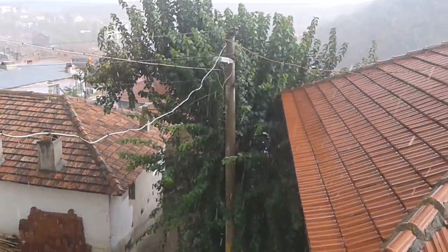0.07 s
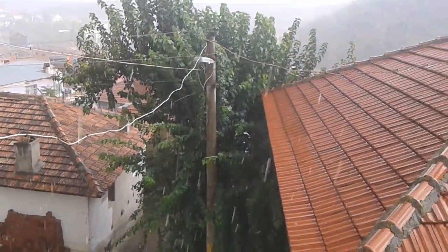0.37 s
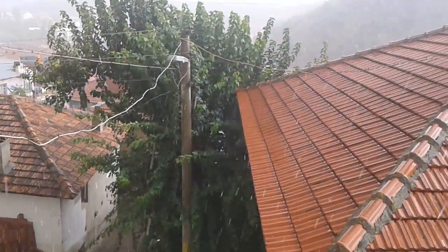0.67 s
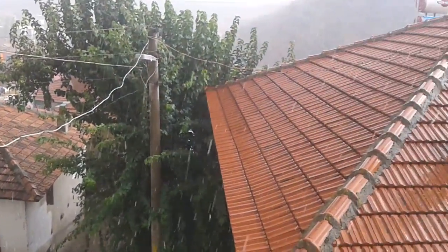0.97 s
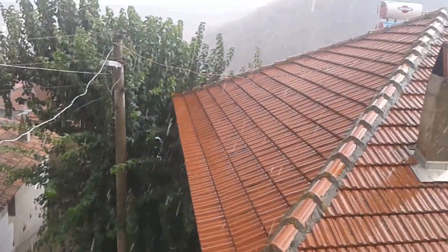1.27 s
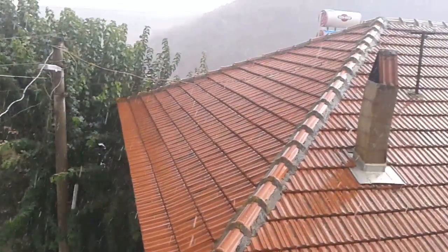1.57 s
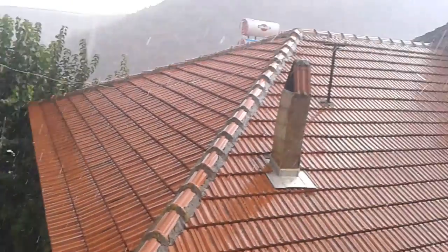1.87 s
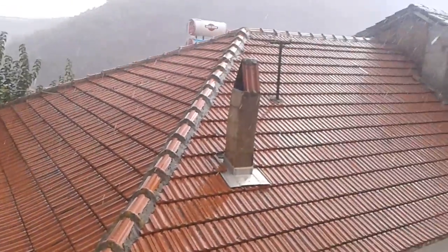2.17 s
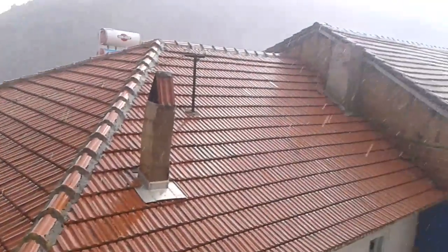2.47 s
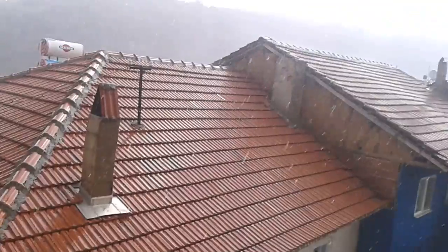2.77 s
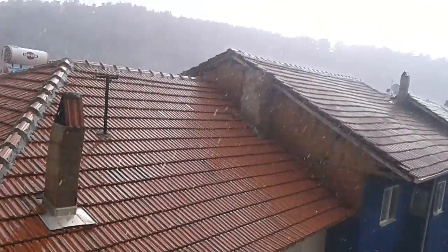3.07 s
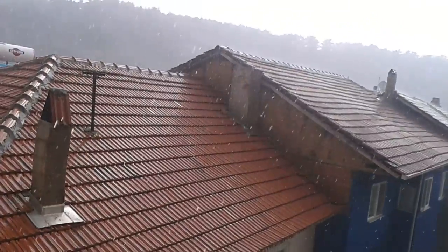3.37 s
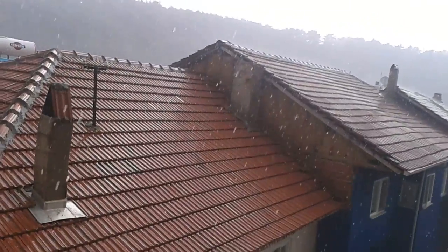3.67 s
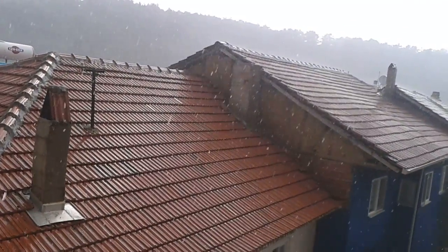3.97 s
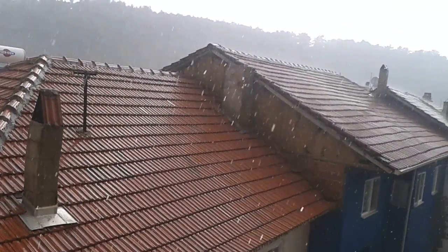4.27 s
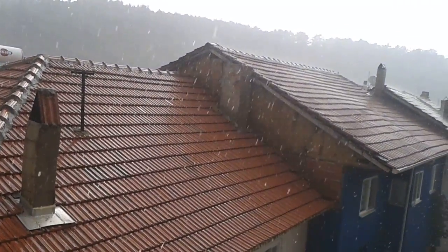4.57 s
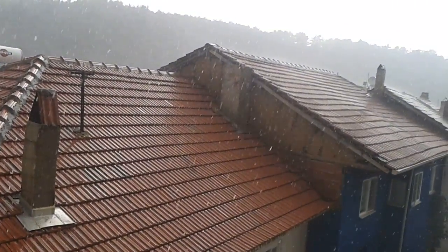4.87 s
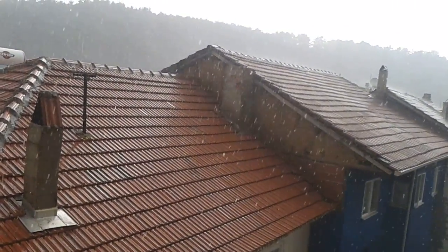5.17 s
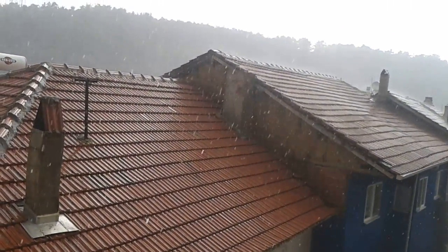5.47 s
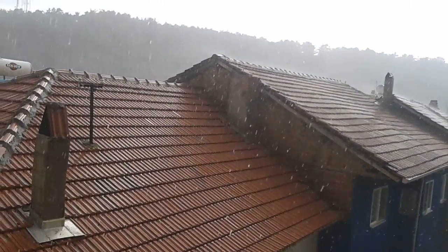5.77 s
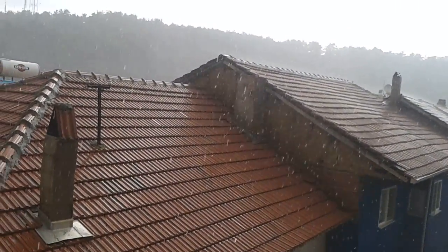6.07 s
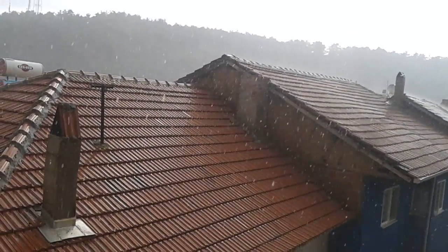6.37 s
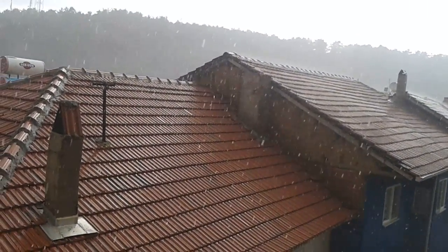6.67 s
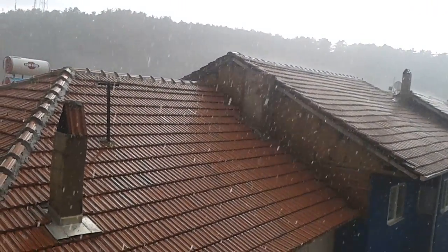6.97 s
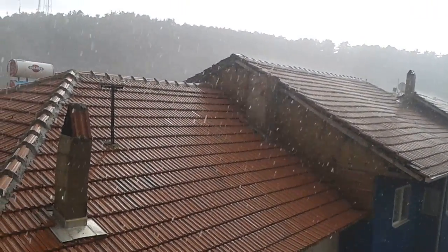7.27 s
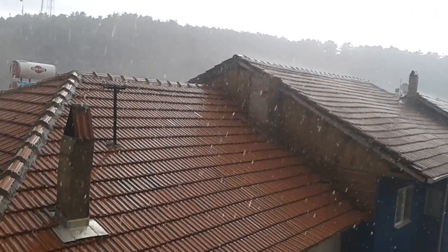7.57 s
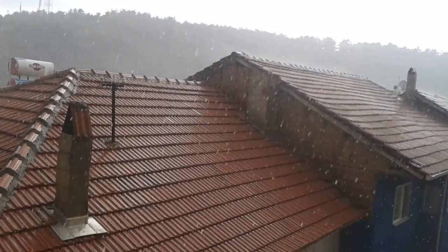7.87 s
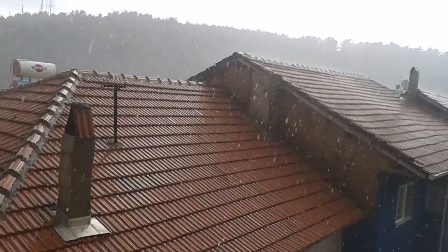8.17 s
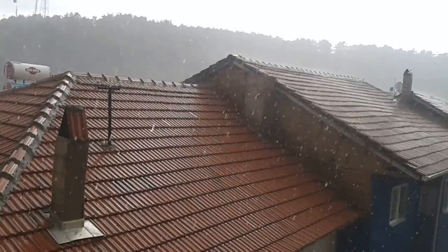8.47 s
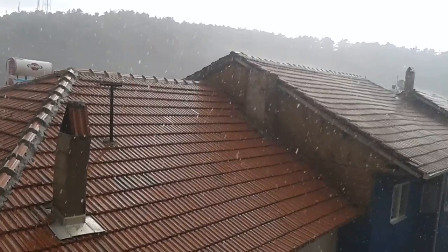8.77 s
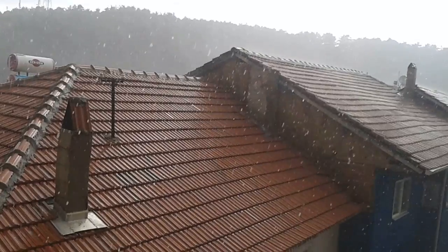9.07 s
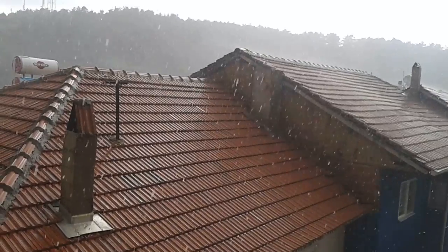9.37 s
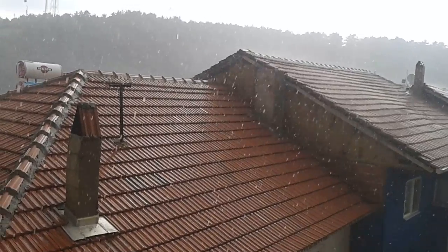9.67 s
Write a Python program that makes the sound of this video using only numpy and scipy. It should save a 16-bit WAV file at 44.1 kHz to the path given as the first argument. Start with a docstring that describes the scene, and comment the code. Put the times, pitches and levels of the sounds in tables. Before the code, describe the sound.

Heavy rain and hail patter and hiss on tiled roofs, with sharp cracks from hailstones and one roll of thunder.

```python
"""An upper window in a hillside town, with heavy rain and hail coming down on clay-tiled roofs.
Countless drops merge into a patter, under a bright hiss that grows as the listener turns towards the
next roof. Sheets of rain swell and ebb. Single hailstones crack on tiles, knock on sheet metal and tick
close by. One peal of thunder rolls through, a crowd of shock fronts echoed by the hills.
Far roofs lay down a low roar, with a few soft thuds underneath."""
import sys
import numpy as np
from scipy import signal
from scipy.fft import rfft, irfft
from scipy.io import wavfile

SR = 44100
rng = np.random.default_rng(int(sys.argv[2]) if len(sys.argv) > 2 else 0)


def persist_wave(psi):
    """Save psi, clipped to +-1, as 16-bit WAV."""
    counts = np.round(np.clip(psi, -1, 1) * 32767).astype(np.int16)
    wavfile.write(sys.argv[1], SR, np.atleast_2d(counts).T)


N = 429093

# Table levels are relative: each layer gets its own trim in the mix.
# rain faders as the listener turns: t/s, patter/dB, hiss/dB, fizz/dB, finest spray/dB
RAIN_FADERS = [(0.0, -22, -27.5, -41.5, -42.5), (1.5, -18.5, -24.5, -37, -40),
               (2.3, -22.5, -27.5, -37.5, -42.0), (3.2, -20.5, -23.5, -36.5, -40.5),
               (3.7, -21, -18, -41, -39.0), (4.4, -22.5, -19.5, -38, -40.5),
               (5.1, -21.5, -18.5, -38.5, -40.5), (6.6, -20, -18, -37.5, -41),
               (7.6, -20.0, -17.5, -36, -40.0), (8.3, -19.5, -17.0, -36.5, -39.0),
               (8.8, -19, -16, -46.5, -37.5), (9.73, -18, -16.0, -48.0, -33)]
# the smallest drops come and go with the direction faced: t/s, level/dB
SIZZLE_FADER = [(0, 5.5), (0.7, 5), (1.6, -0.5), (2.2, -15), (2.8, 1), (3.2, -14), (3.55, -5), (3.9, 0),
                (4.4, 3.5), (6, 1), (8.2, 1.5), (8.7, -3.5), (9.7, -2)]
# the bed of far roofs all round: t/s, level/dB
ROAR_FADER = [(0, -38), (2.4, -40), (3.2, -39), (5.3, -36.5), (6.1, -33.5), (7.2, -35.5), (9.73, -35)]
# sheets of rain, negative for a lull: centre t/s, length/s, swell/dB
FLURRIES = [(0.09, 0.14, 2.5), (0.352, 0.15, 4), (0.447, 0.08, 4.2), (0.58, 0.5, 2), (1.01, 0.68, -2.5),
            (1.042, 0.15, 4), (1.165, 0.083, 2.5), (1.23, 0.09, 1.5), (1.636, 0.079, -1.5),
            (2.046, 0.3, 1.5), (2.505, 0.15, 1.7), (2.624, 0.09, 2), (2.808, 0.21, 3.7), (3.289, 0.07, 5),
            (4.464, 0.5, 1.8), (4.824, 0.39, 1.5), (5.336, 0.21, 1.5), (5.49, 0.12, -2.5),
            (5.615, 0.1, 1.6), (5.757, 0.18, 2.5), (6.438, 0.082, 2), (6.66, 0.14, -1.5), (6.75, 0.1, 1.7),
            (7.12, 0.055, -3), (7.62, 0.15, 3), (9.015, 0.13, 1)]
# hailstones on tiles, and at 3.41 s one crack of the thunder, played the same way: t/s, blow level/dB, ring
# f/Hz, t60/s, shattering/0-1
TILE_HITS = [(0.048, -8, 1880, .12, .5), (0.162, -2.5, 1750, .083, 0.4), (0.374, -6, 2000, .06, .6),
             (0.537, -7, 2020, .08, .25), (1.223, -8, 3280, .06, .6), (1.458, -4, 2160, .11, 0.3),
             (1.483, -1.5, 2170, .055, .4), (1.578, -7, 4050, 0.058, .4), (1.953, -10, 1580, .1, .4),
             (2.5965, -9, 2490, .09, .4), (3.0525, -14, 2130, .08, .7), (3.156, -11, 1400, .1, .6),
             (3.29, -4.5, 3400, .09, .95), (3.412, -5, 1140, .076, 0.7), (3.4737, -3, 2420, .07, 1),
             (3.779, -6, 4440, 0.11, .6), (6.143, -6, 2480, .11, .45), (6.15, -12, 760, 0.13, .5),
             (6.872, -1.5, 3300, .07, 1), (7.249, -2, 4480, .06, .7), (7.621, -10, 1020, .12, .4),
             (8.252, -7, 2520, .11, .2), (8.49, -5, 4700, .045, .6), (8.574, -5, 2530, .22, .32),
             (9.028, -6, 5400, .08, .5), (9.393, -1.5, 4360, .073, .5), (9.4365, -7, 3920, .08, .5)]
# hailstones on sheet metal: t/s, level/dB, ring f/Hz
METAL_HITS = [(0.371, -14, 640), (0.376, -19, 830), (0.39, -19, 540), (0.762, -19.5, 545),
              (1.014, -25, 550), (1.224, -16.5, 578), (1.34, -21.5, 560), (1.573, -23, 550),
              (1.95, -18, 568), (2.594, -21, 574), (3.289, -22, 650), (7.013, -19, 550), (7.314, -23, 550),
              (7.899, -19.5, 533), (8.715, -19, 550)]
# modes of the sheet metal: multiple of the ring pitch, level/dB, t60/s
SHEET_MODES = [(1, 7.5, 0.097), (.91, -10, 0.15), (1.13, 2.5, 0.068), (2.9, -12, .05)]
# drops and ice grains bursting close by: t/s, level/dB
TICKS = [(0.0478, -14), (0.1555, -12), (0.4294, -14), (0.7153, -15), (1.1548, -15), (1.222, -8),
         (2.7372, -13), (3.0116, -12), (3.2515, -15), (3.2944, -10), (3.4735, -17), (3.7818, -13),
         (4.4308, -13), (4.5545, -10), (4.7716, -14), (6.2, -16), (6.9546, -11), (7.2499, -12),
         (8.1304, -6.5), (8.2741, -6), (8.413, -10), (8.4901, -9), (8.9531, -17), (9.414, -15)]
# thunder rolls, one per stretch of the lightning channel: t/s, hold/s, rumble/dB, crackle/dB
ROLLS = [(3.27, .035, -25.5, -21), (3.337, 0.21, -21, -25), (3.39, 0.032, -21, -19),
         (3.7, 0.071, -21.5, -21), (3.859, 0.06, -23, -20.5), (4.005, 0.083, -23, -23),
         (4.41, 0.15, -24, -27.5), (4.545, 0.13, -23, -26.5)]
# claps within the peal: t/s, level/dB, f/Hz, t60/s
CLAPS = [(3.503, -8, 290, .06), (3.541, -6, 283, 0.12), (3.728, -13, 198, 0.054), (3.766, -12, 250, 0.055),
         (3.837, -1, 304, 0.089), (3.884, -9, 306, 0.17), (4.039, -9, 327, 0.083), (4.363, -9, 486, 0.036),
         (4.429, -9, 312, 0.033), (4.577, -9, 497, 0.19), (4.897, -19, 200, 0.055)]
# soft low thuds: t/s, level/dB, f/Hz, t60/s
THUDS = [(0.45, -44.5, 85, 1.9), (0.515, -28, 252, 1.1), (2.799, -40, 130, .3), (6.266, -20, 297, 0.26),
         (6.276, -36, 110, .3), (7.754, -28.5, 88, 0.47)]
# EQ curves that give each layer its tone: f/Hz, level/dB
PATTER_EQ = [(200, -27), (450, -13), (700, -8.5), (1000, -5), (1300, -2.5), (1700, -0.5), (2100, -1),
             (2900, -3), (4000, -6.5), (5500, -14.5), (8000, -21.5), (10500, -25.5), (16000, -31)]
HISS_EQ = [(1500, -44), (2900, -11), (3600, -1.5), (4100, -0.7), (4550, 0.3), (5100, -8), (5900, -7.5),
           (7200, -28.5), (10000, -39)]
SIZZLE_EQ = [(3500, -23.5), (4900, 4), (5700, 0), (6500, -2), (7400, -11.5), (8700, -15), (10500, -44),
             (16000, -45)]
FIZZ_EQ = [(4500, -28), (6800, 5), (8200, -1.5), (9300, -5), (11000, -16.5), (16000, -30)]
SPRAY_EQ = [(3000, -43), (7000, -12), (9500, 2.5), (12000, 0.5), (15000, 4.5), (17000, 0)]
HAIL_CRACK_EQ = [(500, -12), (1800, 1), (4500, 5), (7000, -8), (10000, -18), (16000, -20)]
TICK_EQ = [(1000, -14), (4000, -1), (7000, 0.5), (9500, 0), (12000, -4.5), (17000, -6)]
RUMBLE_EQ = [(20, -30), (50, -25), (95, -14.5), (150, -4), (215, -3), (270, -0.5), (360, 3), (430, -5.5),
             (540, 2), (700, -27), (1200, -38.5)]
CRACKLE_EQ = [(300, -25), (550, 3.5), (800, 7), (1200, 3.5), (2000, 1.5), (4000, -41)]
ROAR_EQ = [(20, -38), (45, -27), (80, -20.5), (135, -6), (220, -5), (295, 2), (400, -1), (550, -0.5),
           (1000, -1), (2500, -43.5)]


def rain():
    """The downpour, from dull body to finest treble; all layers ride the same flurries."""
    surge = from_db(flurries_db())
    patter_gain, hiss_gain, fizz_gain, spray_gain = gains(RAIN_FADERS)
    near = splashes(per_s=440, spread_db=4, t60=0.011)
    # the same close bursts in three layers, scattered into different droplets
    on_tiles, on_water, in_air = near * rng.choice([-1, 1], (3, N))
    drops = patter_gain * patter(on_tiles) + hiss_gain * hiss(on_water)
    drops += spray(in_air, fizz_gain, spray_gain)
    return surge * drops + surge ** 0.62 * roof_roar()   # the far bed swings less


def patter(near):
    """Drops and ice on the clay tiles: a far wash, nearer splashes and short dry rings."""
    splash = from_db(-6.5) * splashes(per_s=500, spread_db=2, t60=0.013) + from_db(-7.5) * near
    rings = from_db(-7.5) * pings(per_s=2400, spread_db=2, low_hz=906.5, high_hz=4990, q=19)
    return from_db(1.24) * unit_rms(eq(wash() + splash + rings, PATTER_EQ))


def hiss(near):
    """Rain bursting on wet surfaces; smaller drops add a higher sizzle."""
    (sizzle_gain,) = gains(SIZZLE_FADER)
    splash = from_db(-4.5) * splashes(per_s=990, spread_db=1, t60=0.014) + from_db(-6) * near
    rings = from_db(-7) * pings(per_s=3000, spread_db=1, low_hz=3001, high_hz=7460, q=40)
    body = unit_rms(eq(wash() + splash + rings, HISS_EQ))
    sizzle = unit_rms(eq(splashes(per_s=4000, spread_db=2.5, t60=0.0075), SIZZLE_EQ))
    return from_db(-0.87) * body + from_db(-7.5) * sizzle_gain * sizzle


def spray(near, fizz_gain, spray_gain):
    """The airy top: the finest droplets, heard only close by, fizz and spit with each splash."""
    fizz = unit_rms(eq(wash() + from_db(-6) * near, FIZZ_EQ))
    spit = unit_rms(eq(wash() + from_db(-2) * near, SPRAY_EQ))
    return from_db(3) * fizz_gain * fizz + from_db(1.7) * spray_gain * spit


def flurries_db(flutter_db=0.73, flutter_per_s=16):
    """How much harder or softer than usual the rain falls: smooth swells and a random flutter."""
    t = np.arange(N) / SR
    swells = sum(db * np.cos(np.pi * np.clip((t - s) / length, -.5, .5)) ** 2
                 for s, length, db in FLURRIES)
    flutter = np.interp(t * flutter_per_s, np.arange(1000), rng.standard_normal(1000))
    return swells + flutter_db * flutter


def hail_on_tiles():
    """A stone strikes and the tile rings; shattering broadens the ring and brings up the crack."""
    rings, cracks, t = np.zeros(N), np.zeros(N), np.arange(SR // 4) / SR
    for s, db, hz, t60, shattering in list(TILE_HITS) + small_stones():
        width_hz = hz * np.interp(shattering, [0, 1], [0.036, 0.52])   # bounces whole ... shatters
        blow = from_db(db) * (1 - decay(t, t60=0.0037))
        add(rings, s, blow * band_noise(len(t), hz, width_hz) * decay(t, t60))
        add(cracks, s, blow * np.sqrt(shattering) * rng.standard_normal(len(t)) * decay(t, t60 * 0.84))
    return from_db(-8) * rings + from_db(-3) * eq(cracks, HAIL_CRACK_EQ)


def small_stones(per_s=7, low_hz=1200, high_hz=4500, t60=0.08):
    """Lighter hail fills in at random times and tile pitches, in rows like TILE_HITS."""
    when, size, spot, shattering = rng.random((round(per_s * N / SR), 4)).T
    db = np.interp(size, [0, 1], [-14.5, -12.5])
    hz = low_hz * (high_hz / low_hz) ** spot
    return list(zip(when * N / SR, db, hz, np.full(len(hz), t60), shattering))


def hail_on_metal():
    """Hollow knocks on a flashing or gutter; the pitch depends on where the stone lands."""
    out, t = np.zeros(N), np.arange(SR // 3) / SR
    for s, db, hz in METAL_HITS:
        shares_db = rng.standard_normal(len(SHEET_MODES))   # each blow balances the modes differently
        ring = sum(from_db(mode_db + share_db) * np.sin(2 * np.pi * hz * ratio * t) * decay(t, t60)
                   for share_db, (ratio, mode_db, t60) in zip(shares_db, SHEET_MODES))
        add(out, s, from_db(db - 3.5) * ring * (1 - decay(t, t60=0.016)))
    return out


def close_ticks(faint_per_s=2.5, lag_s=0.0039):
    """Drops and ice grains burst: a sharp tick, its slap off the window recess and a little spatter."""
    out, t = np.zeros(N), np.arange(SR // 20) / SR
    slap = from_db(-6.5) * (t > lag_s) * decay(np.abs(t - lag_s), t60=0.015)
    spatter = from_db(-8.5) * decay(t, t60=0.05)
    envelope = decay(t, t60=0.0095) + slap + spatter
    faint_ticks = [(at / SR, -18) for at in np.flatnonzero(rng.random(N) < faint_per_s / SR)]
    for s, db in list(TICKS) + faint_ticks:
        add(out, s, from_db(db - 5) * envelope * rng.standard_normal(len(t)))
    return eq(out, TICK_EQ)


def thunder():
    """Shock fronts from along the lightning channel arrive in a crowd; the strongest are claps."""
    rumble_gain, crackle_gain = roll_envelopes()
    rumble = unit_rms(eq(impacts(per_s=760, spread_db=2), RUMBLE_EQ))
    crackle = unit_rms(eq(impacts(per_s=1800, spread_db=2.5), CRACKLE_EQ))
    out = from_db(-0.8) * rumble_gain * rumble + from_db(1.2) * crackle_gain * crackle
    t = np.arange(SR // 4) / SR
    for s, db, hz, t60 in CLAPS:
        clap = band_noise(len(t), hz, hz * 0.54) * decay(t, t60) * (1 - decay(t, t60=0.0083))
        add(out, s, from_db(db - 3) * clap / np.abs(clap).max())
    return out


def roll_envelopes(attack_s=0.025, echo_attack_s=0.15):
    """Each roll rises, holds and dies; the hills send back a long, dull tail with less crackle."""
    rumble_power, crackle_power = np.zeros(N), np.zeros(N)
    for s, hold, rumble_db, crackle_db in ROLLS:
        t = np.maximum(np.arange(N) / SR - s, 0)
        release = np.maximum(t - hold, 0)
        direct = np.minimum(t / attack_s, 1) * decay(release, t60=0.44)
        echo = from_db(-3.5) * np.minimum(t / echo_attack_s, 1) * decay(release, t60=2.6)
        rumble_power += from_db(rumble_db) ** 2 * (direct ** 2 + echo ** 2)
        crackle_power += from_db(crackle_db) ** 2 * (direct ** 2 + (from_db(-2.5) * echo) ** 2)
    return np.sqrt(rumble_power), np.sqrt(crackle_power)


def roof_roar():
    """The low bed: rain drumming on far roofs, blurred by distance."""
    (gain,) = gains(ROAR_FADER)
    return from_db(6.5) * gain * unit_rms(eq(wash(), ROAR_EQ))


def low_thuds():
    """Dull thuds with a soft attack, dying away under the rain."""
    out, t = np.zeros(N), np.arange(SR) / SR
    for s, db, hz, t60 in THUDS:
        envelope = decay(t, t60) * (1 - decay(t, t60=0.024))
        add(out, s, from_db(db) * envelope * band_noise(len(t), hz, hz * 0.41))
    return out


def wash():
    """White noise for distant drops, too many to tell apart."""
    return rng.standard_normal(N)


def splashes(per_s, spread_db, t60):
    """Every impact bursts into droplets: a puff of noise that dies at once."""
    feedback = decay(1 / SR, t60) ** 2
    energy = signal.lfilter([1], [1, -feedback], impacts(per_s, spread_db) ** 2 + 1e-18)
    return unit_rms(np.sqrt(energy) * rng.standard_normal(N))


def pings(per_s, spread_db, low_hz, high_hz, q, count=16):
    """Every impact rings briefly at the pitch of the spot that it hits."""
    hits, spot = impacts(per_s, spread_db), rng.integers(0, count, N)
    pitches = np.geomspace(low_hz, high_hz, count)
    return unit_rms(sum(resonate(hits * (spot == k), hz, hz / q) for k, hz in enumerate(pitches)))


def impacts(per_s, spread_db):
    """Clicks at random moments: many small, a few large."""
    size = from_db(spread_db * np.minimum(rng.standard_exponential(N), 5))
    return (rng.random(N) < per_s / SR) * size * rng.choice([-1, 1], N)


def band_noise(count, hz, width_hz):
    """Noise ringing around one pitch, with steep skirts; rms 1."""
    pre_roll = SR // 10
    noise = rng.standard_normal(count + pre_roll)
    return unit_rms(resonate(resonate(noise, hz, width_hz), hz, width_hz)[pre_roll:])


def resonate(x, hz, width_hz):
    """One resonance, unity gain at its peak."""
    r = np.exp(-np.pi * width_hz / SR)
    feedforward = np.array([1, 0, -1]) * (1 - r * r) / 2
    feedback = [1, -2 * r * np.cos(2 * np.pi * hz / SR), r * r]
    return signal.lfilter(feedforward, feedback, x + 1e-18)


def eq(x, curve, size=8192):
    """Minimum-phase EQ that follows a curve and rolls off below its first point."""
    hz, db = np.transpose(curve)
    bins = np.arange(size // 2 + 1) * SR / size + 1
    response = from_db(np.interp(np.log(bins), np.log(hz), db)) * np.minimum(bins / hz[0], 1)
    cepstrum = irfft(np.log(response))
    cepstrum[1:size // 2] *= 2   # folded forward, so nothing rings ahead of a hit
    cepstrum[size // 2 + 1:] = 0
    return signal.oaconvolve(x, irfft(np.exp(rfft(cepstrum))))[:len(x)]


def gains(faders):
    """Each dB column of a fader table as a gain per sample."""
    s, *columns = np.transpose(faders)
    return [from_db(np.interp(np.arange(N) / SR, s, db)) for db in columns]


def add(out, s, sound):
    """Mix a short sound in at time s."""
    at = round(s * SR)
    out[at:at + len(sound)] += sound[:max(N - at, 0)]


def decay(t, t60):
    """Falls by 60 dB in t60."""
    return np.exp(-np.log(1000) * t / t60)


def unit_rms(x):
    return x / np.sqrt(np.mean(x ** 2) + 1e-20)


def from_db(db):
    return 10 ** (np.asarray(db) / 20)


def scene():
    """The storm in the open air, mixed to mono."""
    storm = rain() + thunder() + low_thuds()
    return (storm + hail_on_tiles() + hail_on_metal() + close_ticks())[None, :]


def record(dry):
    """Clip any peaks over full scale, then shave off the very top with a steep low-pass."""
    cutoff_hz = 17250
    top_cut = signal.ellip(16, .1, 60, cutoff_hz, fs=SR, output="sos")
    return signal.sosfilt(top_cut, np.clip(dry, -1, 1))


dry = scene()
out = record(dry)
persist_wave(out)
```